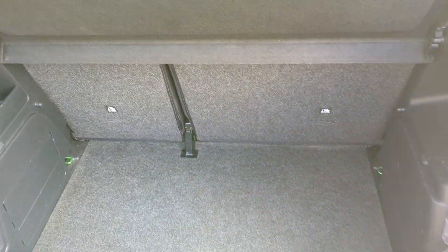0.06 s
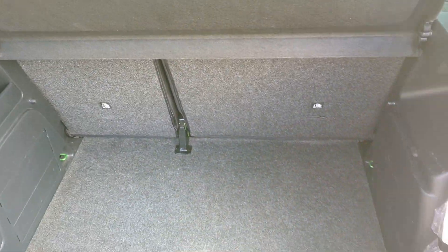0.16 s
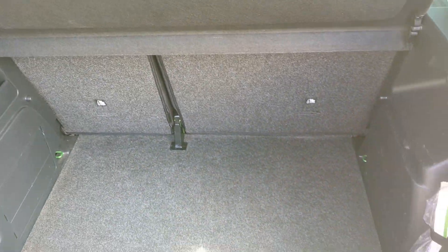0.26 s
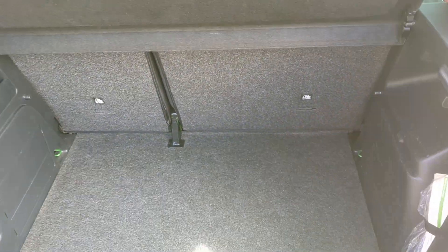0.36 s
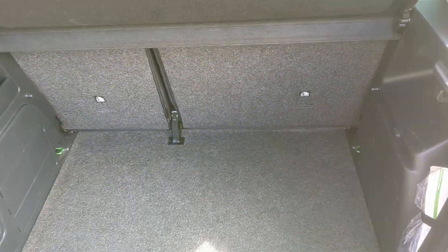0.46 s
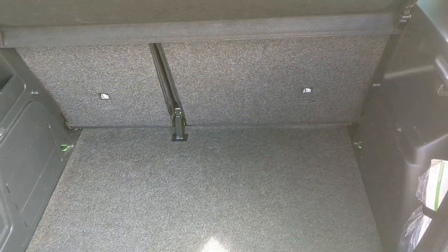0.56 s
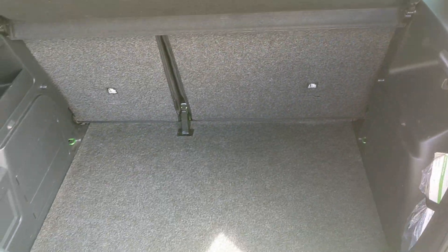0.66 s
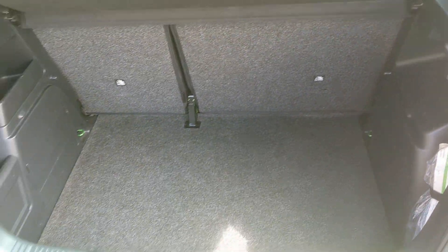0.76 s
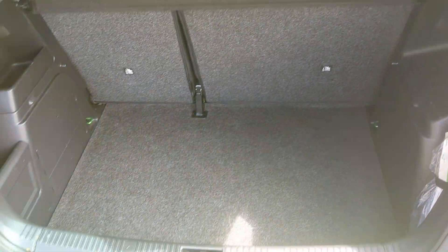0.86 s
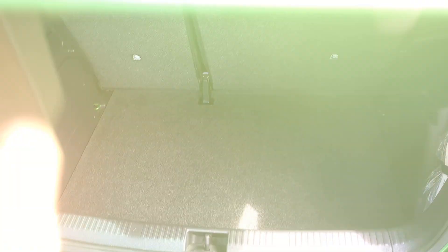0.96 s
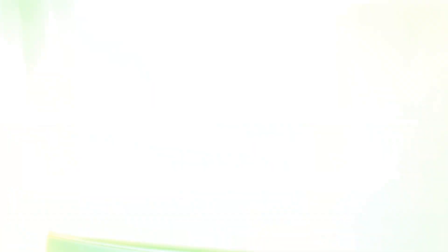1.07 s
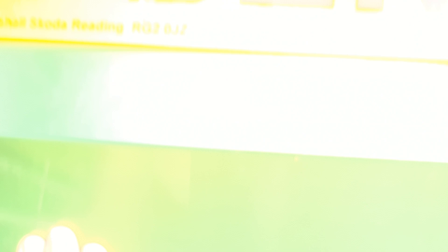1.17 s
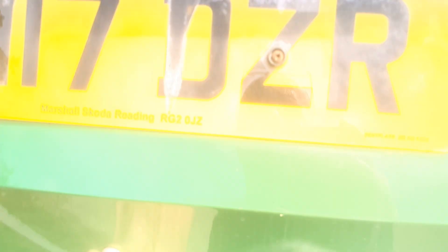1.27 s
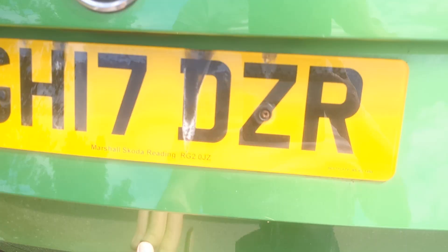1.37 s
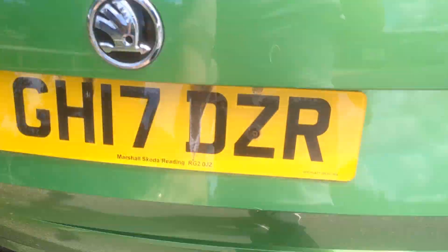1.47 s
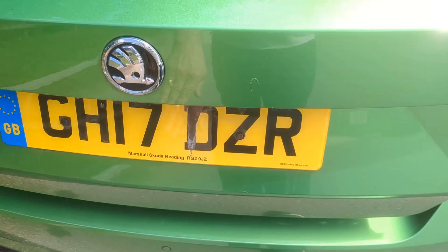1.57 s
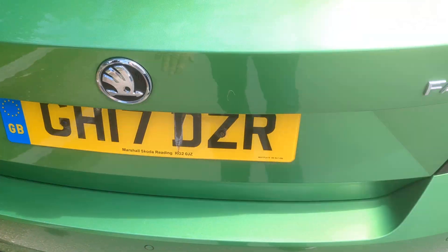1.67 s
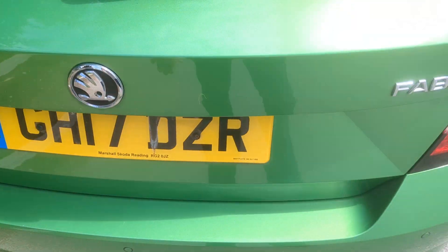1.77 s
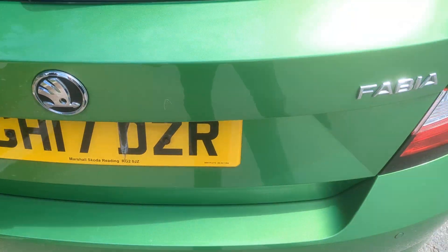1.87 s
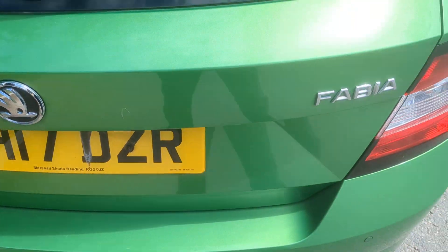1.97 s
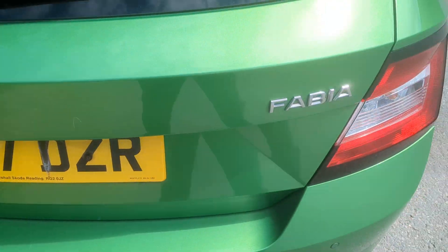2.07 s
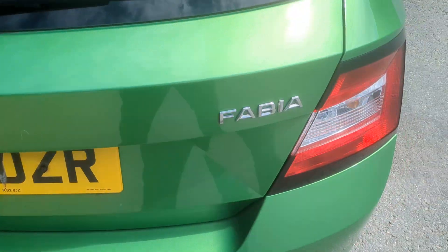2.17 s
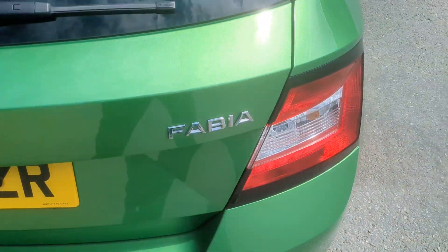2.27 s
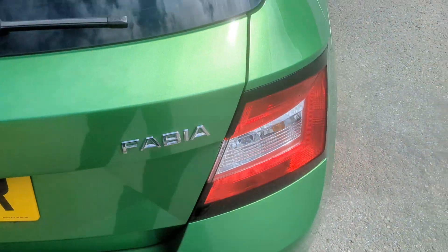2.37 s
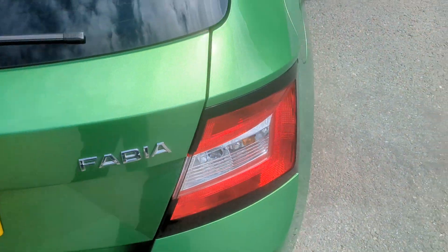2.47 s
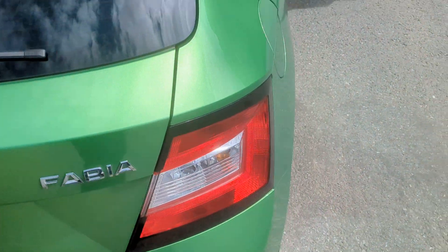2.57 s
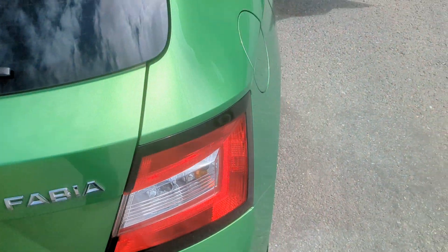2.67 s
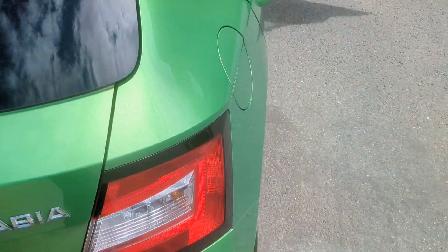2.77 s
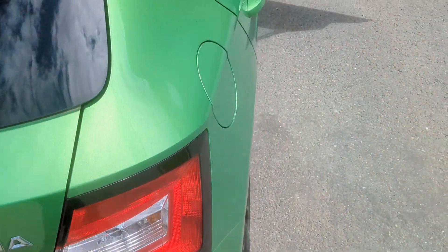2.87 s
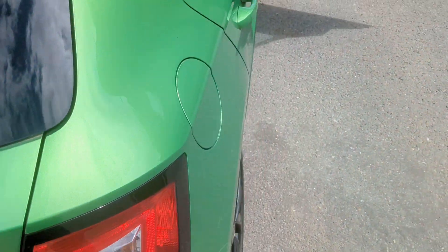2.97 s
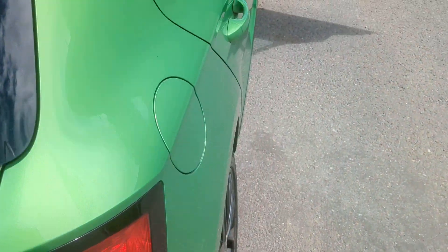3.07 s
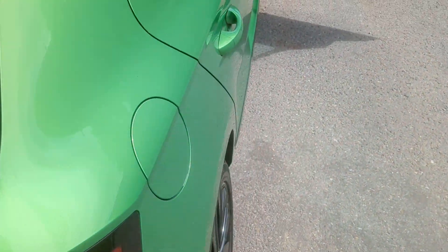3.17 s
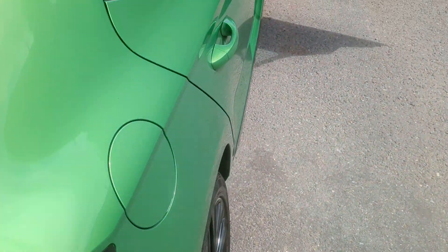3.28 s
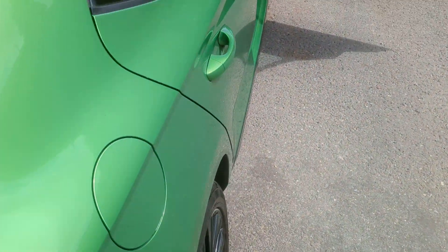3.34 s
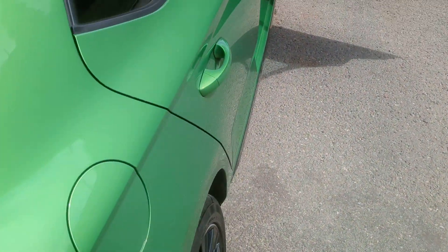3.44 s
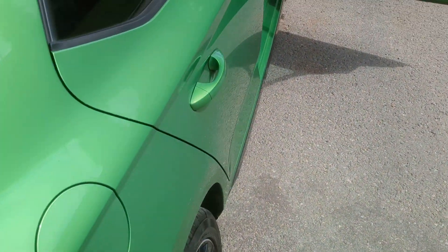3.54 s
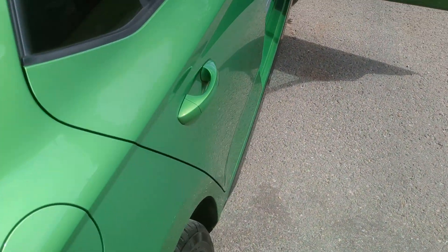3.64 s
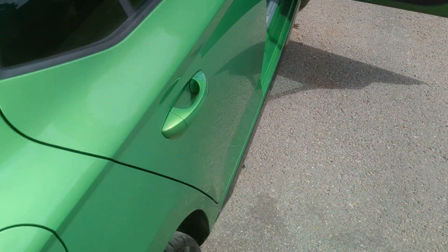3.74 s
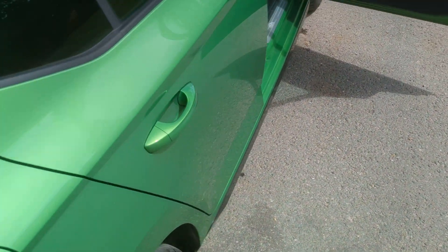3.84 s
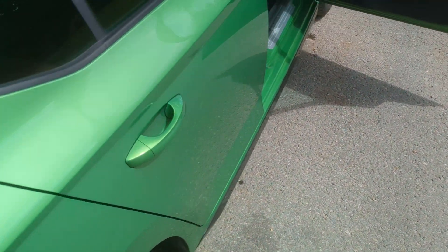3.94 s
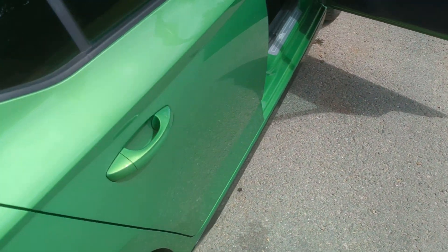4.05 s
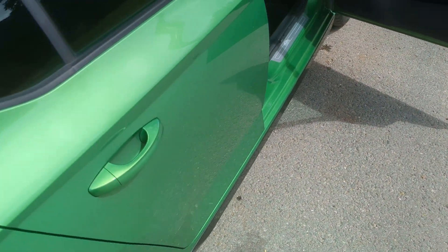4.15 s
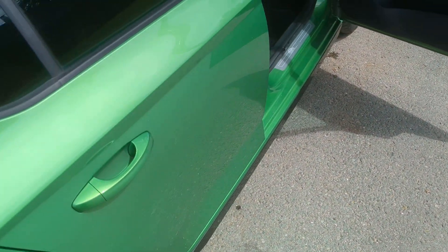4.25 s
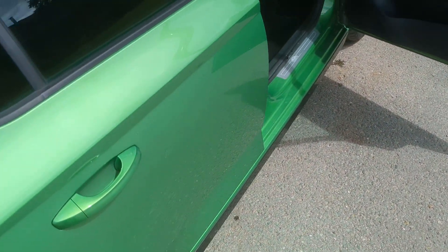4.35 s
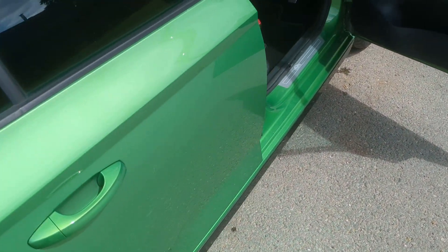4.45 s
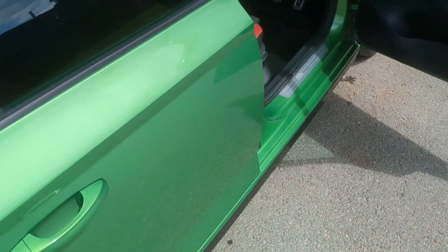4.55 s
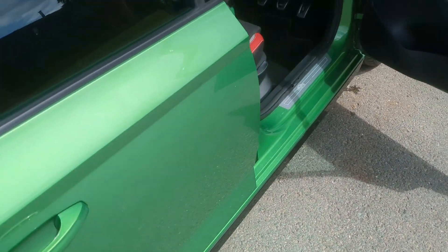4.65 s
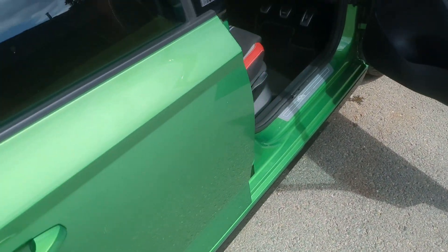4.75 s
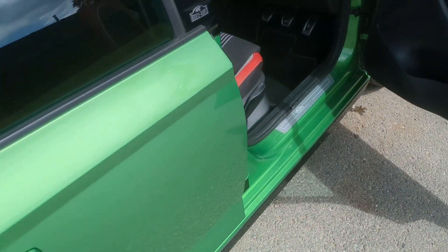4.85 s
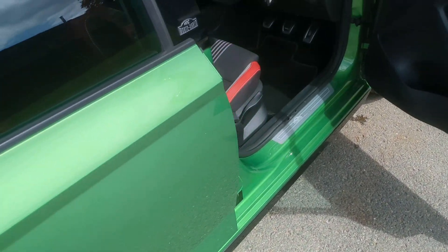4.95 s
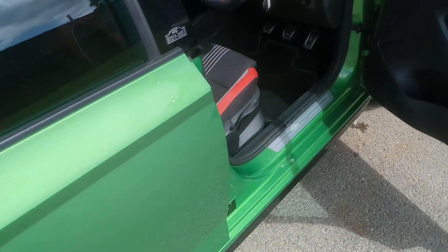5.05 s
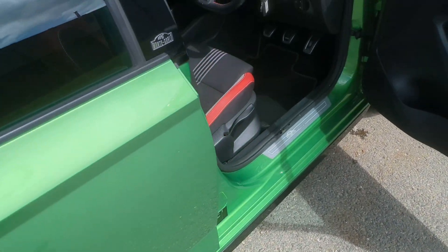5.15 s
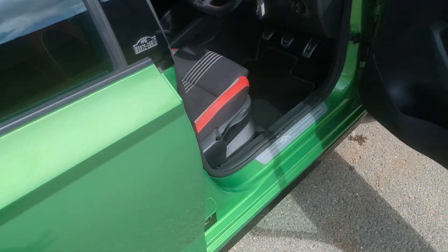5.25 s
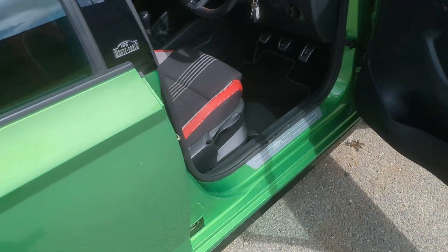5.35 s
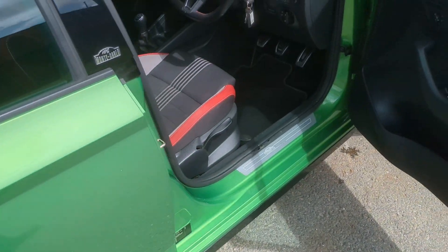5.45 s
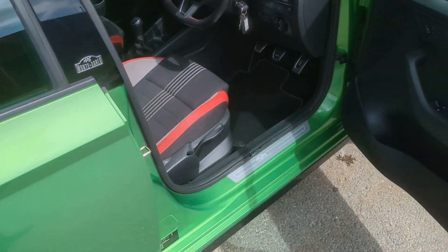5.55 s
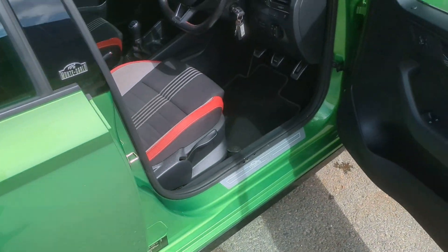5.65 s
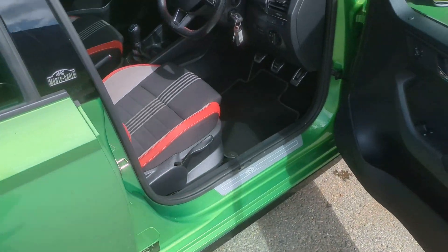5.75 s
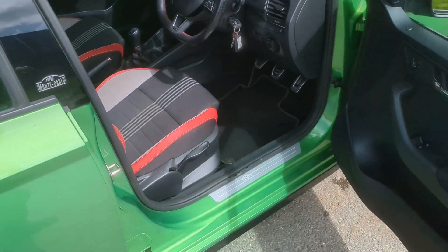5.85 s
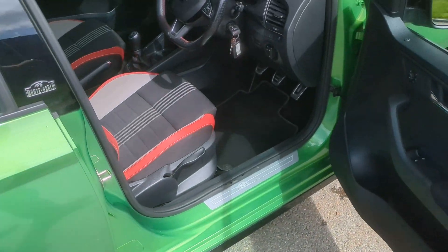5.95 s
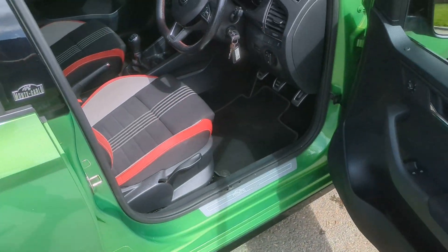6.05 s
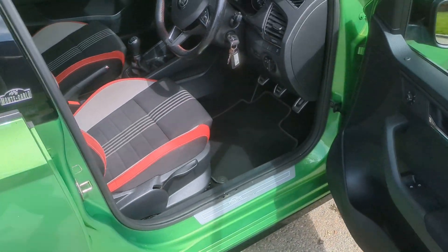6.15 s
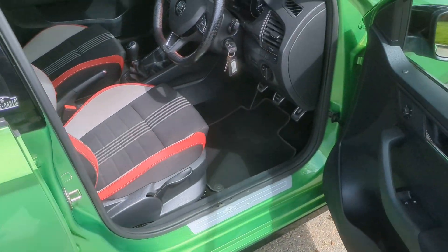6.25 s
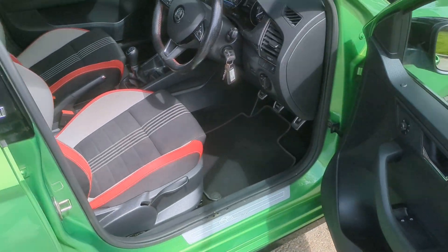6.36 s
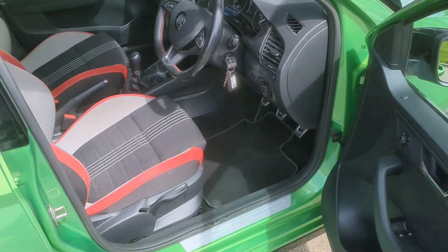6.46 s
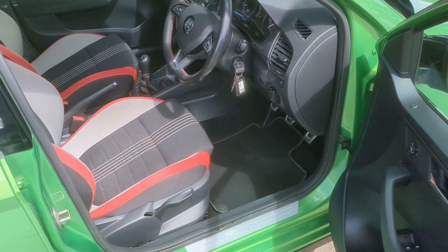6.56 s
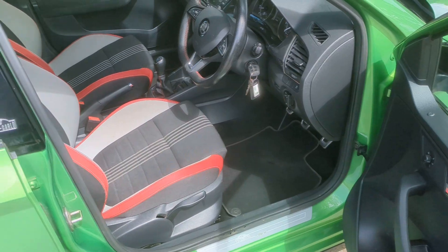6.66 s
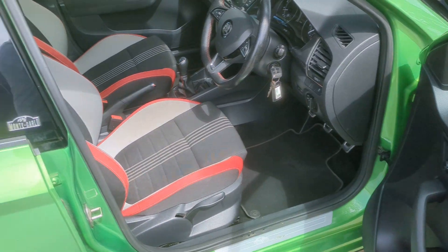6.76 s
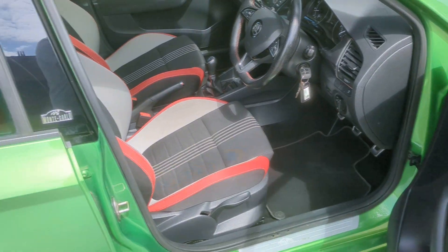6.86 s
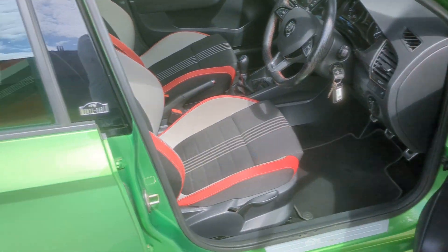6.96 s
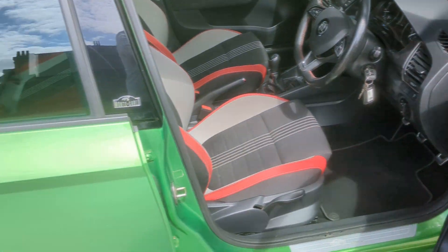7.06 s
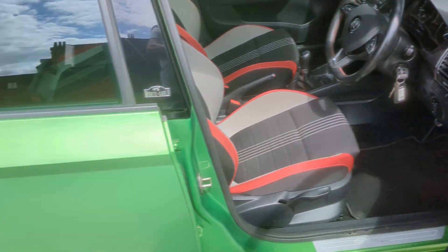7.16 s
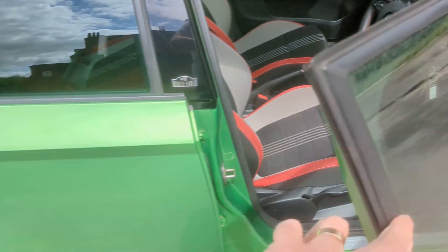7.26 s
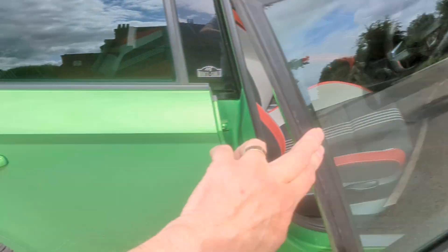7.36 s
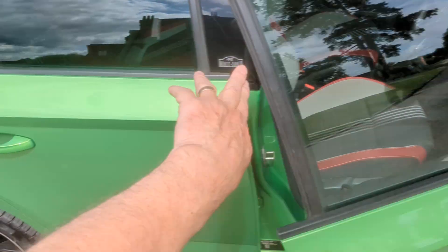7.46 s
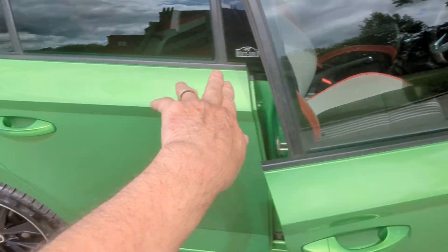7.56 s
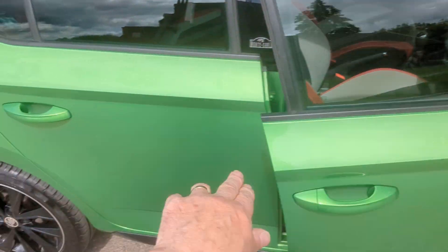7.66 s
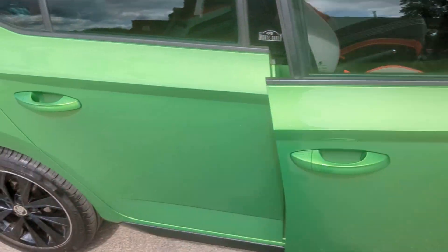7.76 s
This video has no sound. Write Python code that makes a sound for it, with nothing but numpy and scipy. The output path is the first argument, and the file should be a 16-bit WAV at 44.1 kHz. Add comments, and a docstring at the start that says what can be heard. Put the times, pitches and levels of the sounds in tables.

```python
"""A hatchback idles on open tarmac, muffled at first inside the boot: firing pulses, a hum, shaped noise, whines.
Soft bumps and rustles pull the boot lid down; it slams at the microphone as decaying modes and noise bursts,
with rebounds and a low pulse of cabin air. A walk along the car lifts the engine clatter and passes a gap
under the sill, with small clicks on the way. At the end a flat hand swings the front door to: rustle, then thud.
Far-off birds, made of gliding sines with a noise echo, call now and then throughout."""
import sys
import numpy as np
from scipy import signal
from scipy.fft import rfft, irfft, next_fast_len
from scipy.io import wavfile

SR = 44100
rng = np.random.default_rng(int(sys.argv[2]) if len(sys.argv) > 2 else 0)


def pcm_store(signal):
    """Save signal as 16-bit PCM."""
    levels = np.round(np.clip(np.atleast_2d(signal), -1, 1) * 32767)
    wavfile.write(sys.argv[1], SR, levels.astype(np.int16).T)


N = 344862
TIME = np.arange(N) / SR   # s


def from_db(db):
    """Level in dB to amplitude factor."""
    return 10 ** (np.asarray(db) / 20)


def rms_one(x):
    """Scale a signal to rms 1."""
    return x / np.sqrt(np.mean(x ** 2) + 1e-20)


def in_time(rows):
    """Columns of a curve, joined by straight lines, at every sample."""
    s, *columns = np.transpose(rows)
    return [np.interp(TIME, s, column) for column in columns]


def at_hz(points, hz):
    """A spectrum read on a log-frequency axis."""
    point_hz, value = np.transpose(points)
    return np.interp(np.log(hz), np.log(point_hz), value)


# how alike the two channels of noise are: frequency_hz, correlation (0 to 1)
STEREO_LIKENESS = [(60, 0.8), (290, 0.96), (640, 0.79), (1400, 0), (3100, 0.2), (6800, 0)]


def noise(gain_at, size=N):
    """Stereo noise of rms 1 with the given gain over frequency; the channels agree mostly in the bass."""
    padded = next_fast_len(size)
    hz = np.maximum(np.fft.rfftfreq(padded, 1 / SR), 1)
    alike = np.clip(at_hz(STEREO_LIKENESS, hz), -1, 1)
    mid, side = rfft(rng.standard_normal((2, padded)))
    pair = np.sqrt(1 + alike) * mid + np.sqrt(1 - alike) * side * [[1], [-1]]
    return rms_one(irfft(pair * gain_at(hz), padded)[:, :size])


def coloured(spectrum):
    """Noise of rms 1 that follows the shape of a spectrum table."""
    return noise(lambda hz: from_db(at_hz(spectrum, hz)))


def noise_around(centre_hz, octaves, size=N):
    """Noise of rms 1 in one flat-topped band."""
    return noise(lambda hz: 1 / (1 + (np.log2(hz / centre_hz) / octaves) ** 4), size=size)


def resonant(peaks):
    """Noise of rms 1 inside a few resonances."""
    def gain_at(hz):
        return sum(from_db(db) / np.sqrt(width) / (1 + ((hz - centre) / width) ** 2)
                   for centre, width, db in peaks)
    return noise(gain_at)


def drift(rate):
    """Random wander of spread 1, with `rate` new values a second."""
    knots = rng.standard_normal(int(rate * N / SR) + 2)
    return np.interp(TIME * rate, np.arange(len(knots)), rms_one(knots))


def pan(left_db):
    """Channel gains that make the left louder than the right by left_db."""
    return from_db([[left_db / 2], [-left_db / 2]])


def clicks(times, heights):
    """Single-sample impulses."""
    out = np.zeros(N)
    out[np.round(times * SR).astype(int)] = heights
    return out


def ring(drive, hz, t60):
    """A two-pole resonator: a unit click sets a sine of height 1 ringing and dying over t60."""
    radius = from_db(-60 / (t60 * SR))
    angle = 2 * np.pi * hz / SR
    feedback = [1, -2 * radius * np.cos(angle), radius * radius]
    return signal.lfilter([0, np.sin(angle)], feedback, drive + 1e-18)


def dying(hits, t60):
    """Envelope of hits whose energies add up and die away."""
    energy_kept = from_db(-120 / (t60 * SR))
    return np.sqrt(signal.lfilter([1], [1, -energy_kept], hits ** 2 + 1e-24))


def struck(hits, modes, uneven_db, delay_s):
    """Hits ring each mode a little differently, neighbours in opposite sign; the right channel lags."""
    out = np.zeros((2, N))
    for k, (hz, db, t60) in enumerate(modes):
        drive = hits.copy()
        drive[hits != 0] *= from_db(uneven_db * rng.standard_normal(np.count_nonzero(hits)))
        tone = (-1) ** k * from_db(db) * ring(drive, hz, t60)
        lag_s = min(delay_s, 1 / hz / 4)   # never over a quarter cycle
        out += [tone, np.interp(TIME - lag_s, TIME, tone)]
    return out


def touches(rows):
    """Each touch is a puff of noise around its own pitch that swells and dies."""
    out, t = np.zeros((2, N + SR)), TIME[:SR // 2]
    for s, db, centre, octaves, rise, t60 in rows:
        shape = np.minimum(t / rise, 1) * from_db(-60 * np.maximum(t - rise, 0) / t60)
        start = round(s * SR)
        out[:, start:start + len(t)] += from_db(db) * shape * noise_around(centre, octaves, size=len(t))
    return out[:, :N]


# modes of the lid and body panels: pitch_hz, level_db (relative), t60_s
PANEL_MODES = [(135, -31, .22), (182, -24, .14), (214, -23, .16), (265, -24, .13), (302, -20, .13),
               (339, -25, .11), (374, -20, .13), (412, -21, .12), (462, -23, .1), (519, -20, .12),
               (554, -25, .12), (610, -30, .1), (706, -25, .09), (780, -28, .09), (826, -29, .1),
               (880, -29, .12), (937, -33, .11), (1020, -35, .1), (1131, -27, .1), (1233, -35, .1)]


def body_panels(hardest):
    """The hardest blow rings the sheet metal as a set of damped sines."""
    return from_db(0.5) * struck(hardest, PANEL_MODES, uneven_db=3.0, delay_s=0.00026)


# heavily damped skin and trim around the lock: pitch_hz, level_db (relative), t60_s
LOCK_SKIN_MODES = [(195, -14.5, 0.07), (323, -6.5, 0.026), (533, -11.5, 0.065), (810, -25, 0.049),
                   (1196, -22.5, 0.032)]


def lock_skin(blows):
    """Every contact thumps the damped skin near the lock."""
    return struck(blows, LOCK_SKIN_MODES, uneven_db=4.5, delay_s=0.0002)


# steel latch and striker: pitch_hz, level_db (relative), t60_s
LATCH_MODES = [(2045, -12, .07), (2138, -14, .08), (2304, -12, .08), (2442, -15, .07), (2588, -13, .08),
               (2852, -15, .08), (3780, -19, .06), (4080, -20, .07), (7000, -21, .04), (9550, -20, .03)]


def steel_latch(snaps):
    """The latch and striker ring bright and short at each snap."""
    return from_db(-5.0) * struck(snaps, LATCH_MODES, uneven_db=4.5, delay_s=0.00013) * pan(-1.3)


# colour of the crack and rattle: frequency_hz, level_db_per_hz (relative)
CRACK_SPECTRUM = [(760, -36), (1300, -10.5), (1510, -12.5), (2060, 2), (2520, -1), (3560, -9), (3920, -10),
                  (4350, -19.5), (4880, -15.5), (8000, -17.5), (9460, -17), (15300, -23), (16000, -32)]


def crack_and_rattle(snaps, crack_t60=0.031, rattle_t60=0.095):
    """Countless small modes of trim and lock, as noise: a short crack, then a rattle."""
    envelope = from_db(-10.5) * dying(snaps, crack_t60) + from_db(-13.0) * dying(snaps, rattle_t60)
    return coloured(CRACK_SPECTRUM) * envelope * pan(.8)


# booming modes of cabin air and body shell: pitch_hz, level_db (relative), t60_s
CABIN_MODES = [(46.3, -29.5, 0.73), (62.5, -27, 0.6), (93, -23, 0.29)]


def cabin_air(hardest, rock_at=1.655, rock_s=0.048, rock_hz=66, rock_crest=1.5):
    """The lid rocks a few times on its rubber seal and pumps the cabin air, which booms on."""
    swell = np.sin(np.pi * np.clip((TIME - rock_at) / rock_s, 0, 1)) ** 2
    rocking = from_db(-12.8) * swell * np.cos(2 * np.pi * rock_hz * (TIME - rock_crest))
    boom = sum(from_db(db) * ring(hardest, hz, t60) for hz, db, t60 in CABIN_MODES)
    return rocking + boom


# colour of the sound scattered outdoors: frequency_hz, level_db_per_hz (relative)
YARD_SPECTRUM = [(80, 17), (350, 2.5), (700, -14), (1400, -20), (2600, -15.5), (5000, -26.5), (15000, -38)]


def yard_scatter(blows, t60=0.88):
    """The blows come back from outdoors as a dying wash of noise."""
    return from_db(-31.5) * coloured(YARD_SPECTRUM) * dying(blows, t60)


# the seal squeezes shut, the striker snaps, the second catch drops in:
# start_s, level_db, centre_hz, width_octaves, rise_s, t60_s
SEAL_AND_CATCH_TOUCHES = [(1.6495, -26, 537, 1.7, 0.0021, 0.022), (1.6515, -36, 3000, 2, 0.0039, 0.014),
                          (1.657, -19, 6800, 1.4, 0.00057, 0.0062),
                          (1.662, -25.5, 9800, 0.14, 0.0011, 0.038),
                          (1.6925, -29, 11000, 1.1, 0.0018, 0.018)]


def seal_and_catch():
    """Rubber and small lock parts touch without ringing: short puffs of noise."""
    return touches(SEAL_AND_CATCH_TOUCHES)


# contacts of the lid: start_s, panel_blow_db, latch_crack_db (both relative)
LID_CONTACTS = [(1.6573, 0, -7.5), (1.6622, -23, -17.5), (1.6741, -3.5, -15), (1.681, -4.5, -19.5),
                (1.694, -5.5, -25.5), (1.706, -15, -48)]


def boot_lid():
    """The lid meets its seal, the latch snaps over the striker, and the lid rebounds against it."""
    s, blow_db, crack_db = np.transpose(LID_CONTACTS)
    blows, snaps = clicks(s, from_db(blow_db)), clicks(s, from_db(crack_db))
    # only the hardest blow sets the whole body ringing; the rebounds stay near the lock
    hardest = blows * (blows == blows.max())
    metal = body_panels(hardest) + lock_skin(blows) + steel_latch(snaps) + crack_and_rattle(snaps)
    return metal + cabin_air(hardest) + yard_scatter(blows) + seal_and_catch()


# the hand lands on the door, the door pushes air ahead of it and thuds:
# start_s, level_db, centre_hz, width_octaves, rise_s, t60_s
DOOR_TOUCHES = [(7.4705, -40.5, 530, 0.44, 0.0018, .08), (7.535, -34, 66.6, 0.47, .025, 0.2),
                (7.602, -30, 90, 0.54, .004, 0.076)]


def front_door():
    """Hand, pushed air and thud are three soft bursts of low noise."""
    return touches(DOOR_TOUCHES)


def in_boot(leave_s=1.21, takes_s=1):
    """1 while the boot shields the microphone from the engine, 0 out in the open."""
    return np.clip(1 - (TIME - leave_s) / takes_s, 0, 1)


# nearness to the engine during the walk: time_s, nearness_db (counts relative to its highest value)
ENGINE_NEARNESS = [(2.4, -68), (3.81, -61.5), (6.07, -57.5), (6.7, -61), (7.71, -59), (7.8, -58.5)]


def heard_db(mix):
    """Base level of one part of the idle: it follows the walk by its own share, muted inside the boot."""
    nearest_db, share, boot_loss_db = mix
    near_db, = in_time(ENGINE_NEARNESS)
    return nearest_db + share * (near_db - near_db.max()) - boot_loss_db * in_boot()


# harmonics of the exhaust: multiple_of_firing_rate, level_db (relative)
EXHAUST_HARMONICS = [(1, -38), (2, -0.5), (3, 2.5), (4, -16), (5, -4), (6, -10.5), (9, -21), (11, -23.5),
                     (12, -17.5), (18, -10.5)]
# every mix of the idle: base_level_at_nearest_db, share_of_nearness, boot_loss_db
EXHAUST_LEVELS = (-55.5, -0.3, 16.8)


def exhaust_pulses(firing):
    """Gas pulses at the firing rate: harmonics that each waver in level."""
    pulses = sum(from_db(db + 1.8 * drift(3.13)) * np.sin(2 * np.pi * k * firing)
                 for k, db in EXHAUST_HARMONICS)
    return np.sqrt(2) * from_db(heard_db(EXHAUST_LEVELS)) * pulses


# base_level_at_nearest_db, share_of_nearness, boot_loss_db
FAN_LEVELS = (-42.5, 0.76, 42)


def fan_hum(fan_hz=75.06):
    """The fan hums on one low sine of wavering level."""
    return np.sqrt(2) * from_db(heard_db(FAN_LEVELS) + 1.8 * drift(3.76)) * np.sin(-2 * np.pi * fan_hz * TIME)


# colour of the rumble: frequency_hz, level_db_per_hz (relative)
RUMBLE_SPECTRUM = [(20, -18), (45, -0.5), (70, 6), (110, 3.5), (170, -1.5), (300, -2), (420, -2.5),
                   (560, -6), (700, -18), (1300, -17), (2000, -40.5)]
# base_level_at_nearest_db, share_of_nearness, boot_loss_db
RUMBLE_LEVELS = (-48, .4, 13.6)


def low_rumble():
    """A bed of low noise that barely wavers."""
    return from_db(heard_db(RUMBLE_LEVELS) + 0.56 * drift(9.7)) * coloured(RUMBLE_SPECTRUM)


# colour of the valve gear: frequency_hz, level_db_per_hz (relative)
MECHANICS_SPECTRUM = [(710, -11), (1200, -10), (1630, -8.5), (1960, -3.5), (2250, -2.5), (2480, -2.5),
                      (2800, -4.5), (3100, -4), (4490, -10.5), (5500, -31), (7150, -24), (12100, -120)]
# base_level_at_nearest_db, share_of_nearness, boot_loss_db
MECHANICS_LEVELS = (-53, .95, 8)


def valve_gear(firing, clatter_lag=0.53, clatter_db=2.5, flutter_db=1.6):
    """Valve gear clatters as noise that throbs once a firing; the lag is in firing cycles."""
    clatter = np.cos(2 * np.pi * (firing - clatter_lag))
    level_db = heard_db(MECHANICS_LEVELS) + clatter_db * clatter + flutter_db * drift(90)
    return from_db(level_db) * coloured(MECHANICS_SPECTRUM)


# colour of the hiss: frequency_hz, level_db_per_hz (relative)
HISS_SPECTRUM = [(2820, -6.5), (4800, -1), (5440, -7), (6900, -4), (8060, -10.5), (9330, -6.5),
                 (10600, -9.5), (11900, -8.5), (14100, -14), (15100, -26), (16000, -33)]
# base_level_at_nearest_db, share_of_nearness, boot_loss_db
HISS_LEVELS = (-61, 1, 4.6)


def engine_hiss(tick):
    """High noise that swells slightly at each firing."""
    return from_db(heard_db(HISS_LEVELS) + 2.0 * tick + 0.35 * drift(60)) * coloured(HISS_SPECTRUM)


# colour of the injectors: frequency_hz, level_db_per_hz (relative)
INJECTOR_SPECTRUM = [(6000, -2), (10500, -6.5), (12000, 7), (13300, -10), (14000, -7), (14800, -1),
                     (16000, -14)]
# base_level_at_nearest_db, share_of_nearness, boot_loss_db
INJECTOR_LEVELS = (-64.5, 1.33, 13)


def injector_ticks(tick):
    """Injectors tick once a firing: narrow pulses of very high noise."""
    level = from_db(heard_db(INJECTOR_LEVELS) + 2.0 * drift(23))
    return level * rms_one(tick ** 4) * coloured(INJECTOR_SPECTRUM)


# resonances of the gap under the sill: centre_hz, width_hz, level_db (relative)
SILL_RESONANCES = [(1600, 160, -5), (1765, 15, -4), (2020, 190, 4)]


def sill_gap(pass_s=3.96, peak_db=-56.5, fade_db_per_s2=4.5):
    """Resonant noise swells and fades as the walk passes the gap under the sill."""
    return from_db(peak_db - fade_db_per_s2 * (TIME - pass_s) ** 2) * resonant(SILL_RESONANCES)


def whistle(hz, wander_hz=5, airy_db=0, width_hz=12):
    """A wavering tone inside a narrow band of turbulence, together at rms 1."""
    tone = np.sqrt(2) * np.sin(2 * np.pi * np.cumsum(hz + wander_hz * drift(25)) / SR)
    return rms_one(tone + from_db(airy_db) * resonant([(hz, width_hz, 0)]))


# whining tones of the alternator: pitch_hz, level_db (relative)
ALTERNATOR_TONES = [(1803, -5), (2004, 1.5), (2428, -1), (3110, -8.5), (3790, -3)]
# base_level_at_nearest_db, share_of_nearness, boot_loss_db
ALTERNATOR_LEVELS = (-67, 0.95, 9)


def alternator(fading_db=3.0, fading_per_s=2.5):
    """Thin whining tones that waver and fade in and out, each on its own."""
    tones = np.zeros((2, N))
    for hz, db in ALTERNATOR_TONES:
        level = from_db(db + fading_db * drift(fading_per_s))
        tones += level * whistle(hz, wander_hz=5.5, airy_db=3.0, width_hz=14)
    return from_db(heard_db(ALTERNATOR_LEVELS)) * tones


# swells of the belt's two tones: time_s, lower_db, upper_db (both relative)
BELT_SWELLS = [(1.95, -70, -67), (2.14, -74, -73), (2.99, -61, -66), (3.26, -67, -74), (3.39, -65, -68),
               (4.13, -66.5, -70), (5.46, -57.5, -63.5), (5.66, -68, -74), (6.08, -63.5, -59),
               (6.53, -72, -67), (7.31, -58, -70), (7.57, -72, -75), (7.7, -70, -66)]


def belt(lower_hz=979, upper_hz=1008, gain_db=1.5, boot_loss_db=9.5):
    """Two close tones that swell and fade along the side of the car."""
    lower_db, upper_db = in_time(BELT_SWELLS)
    tones = from_db(lower_db) * whistle(lower_hz) + from_db(upper_db) * whistle(upper_hz)
    return from_db(gain_db - boot_loss_db * in_boot()) * tones


def engine(firing_hz=23.265, tick_lead=.46):
    """One slightly uneven firing cycle paces exhaust, valve gear, hiss and injectors; the rest runs free."""
    firing = firing_hz * TIME + tick_lead + 0.024 * drift(3)   # in firing cycles
    tick = (1 + np.cos(2 * np.pi * firing)) / 2
    low = (exhaust_pulses(firing) + fan_hum() + low_rumble()) * pan(-0.22)
    middle = (valve_gear(firing) + alternator() + sill_gap()) * pan(-0.35)
    high = (engine_hiss(tick) + injector_ticks(tick)) * pan(-0.75)
    return low + middle + high + belt()


def taps(rows, octaves, rise_share):
    """Touches of one kind: one width, and a rise that is a fixed share of the t60."""
    return touches([(s, db, hz, octaves, rise_share * t60, t60) for s, db, hz, t60 in rows])


# soft bumps in the boot as the lid is pulled down: start_s, level_db, centre_hz, t60_s
BOOT_BUMPS = [(.21, -60.5, 235, .3), (.76, -59.5, 354, 0.31), (1.03, -60, 416, 0.37),
              (1.18, -50, 85.7, 0.083), (1.475, -50.5, 316, 0.081)]


def bumps():
    """Dull bumps: narrow bands of mostly low noise."""
    return taps(BOOT_BUMPS, octaves=0.58, rise_share=0.076)


# rustle of lid, clothes and swinging door: start_s, length_s, level_db, centre_hz, width_octaves
RUSTLE_MOVES = [(0.498, 0.58, -71.5, 7200, 1.15), (.5, 0.76, -73.5, 1230, 0.27),
                (1.238, 0.32, -65.5, 1720, 1.25), (1.851, 0.31, -59.5, 1400, 1.2),
                (1.83, 0.9, -69, 8000, 1), (6.801, 0.64, -58.5, 1400, 0.94), (7.1, 0.39, -51.5, 1500, 0.74),
                (7.17, 0.58, -54, 420, 0.92)]


def rustles(skew=0.49, rough_db=1.5, rough_per_s=90):
    """Each movement rubs out a rough band of noise that swells and fades with its speed."""
    out, t = np.zeros((2, N + SR)), TIME[:SR]
    for s, length, db, centre, octaves in RUSTLE_MOVES:
        # a skew under 1: the movement starts fast and slows down
        speed = np.sin(np.pi * np.minimum(t / length, 1) ** skew)
        start = round(s * SR)
        rub = np.sqrt(np.abs(speed)) * noise_around(centre, octaves, size=SR)
        out[:, start:start + SR] += from_db(db) * rub
    return out[:, :N] * from_db(rough_db * drift(rough_per_s))


# small clicks of handling and of grit underfoot: start_s, level_db, centre_hz, t60_s
SMALL_CLICKS = [(.9148, -47.5, 4160, 0.053), (.9545, -54.5, 4450, 0.058), (1.271, -51, 12000, 0.016),
                (1.3089, -52, 8900, 0.019), (1.413, -55.5, 9400, 0.099), (1.8123, -44, 6000, .02),
                (2.158, -57, 4000, .05), (2.2174, -48, 5000, 0.017), (3.2076, -56, 6000, .065),
                (3.6995, -53.5, 8000, 0.091), (3.95, -51.5, 4000, 0.16), (4.5316, -54, 8000, .03),
                (6.2512, -48.5, 3900, 0.044), (7.1157, -53, 3500, .04), (7.4555, -49, 9000, .04),
                (7.5892, -53, 5000, .035)]


def handling_and_grit():
    """Small clicks: wide bands of high noise with a quick rise."""
    return taps(SMALL_CLICKS, octaves=1.14, rise_share=0.025)


def glides(rows, from_hz, to_hz):
    """Pure notes that all slide between the same two pitches."""
    out = np.zeros(N)
    for s, length, db in rows:
        along = np.clip((TIME - s) / length, 0, 1)
        pitch = from_hz + (to_hz - from_hz) * along
        out += from_db(db) * np.sin(np.pi * along) * np.sin(2 * np.pi * np.cumsum(pitch) / SR)
    return out


# falling chirps: start_s, length_s, level_db
BIRD_CHIRPS = [(.488, .033, -55), (2.828, 0.049, -52), (4.154, .035, -51), (6.101, 0.011, -43.5)]
# rising note of a fainter bird: start_s, length_s, level_db
BIRD_RISING_NOTES = [(.66, 0.11, -72)]


def birds(echo_t60=0.47, echo_db=-0.5):
    """Short falling chirps and a faint rising note, scattered by trees and walls."""
    calls = glides(BIRD_CHIRPS, from_hz=2530, to_hz=1914)
    calls = calls + glides(BIRD_RISING_NOTES, from_hz=1220, to_hz=1400)
    scatter = rng.standard_normal((2, SR)) * from_db(-60 * TIME[:SR] / echo_t60)
    echo = signal.fftconvolve(calls[None], rms_one(scatter) / np.sqrt(SR))[:, :N]
    return calls + from_db(echo_db) * echo


def scene():
    """The slam, the door, the idle, the person moving about and the birds."""
    person = bumps() + rustles() + handling_and_grit()
    return boot_lid() + front_door() + engine() + person + birds()


def record(dry, port_share=0.32, port_low_hz=1600, port_high_hz=4200, bass_cut_hz=24, cutoff_hz=15900):
    """The right microphone port favours the presence range; deep bass is cut, peaks rounded, the top cut."""
    presence_band = signal.butter(1, [port_low_hz, port_high_hz], "band", fs=SR, output="sos")
    presence = signal.sosfilt(presence_band, dry)
    heard = (dry + port_share * presence * [[-1], [1]]) * pan(0.98)
    heard = signal.sosfilt(signal.butter(1, bass_cut_hz, "high", fs=SR, output="sos"), heard)
    rounded = heard / (1 + heard ** 6) ** (1 / 6)
    return signal.sosfilt(signal.ellip(10, .1, 90, cutoff_hz, fs=SR, output="sos"), rounded)


dry = scene()
out = record(dry)
pcm_store(out)
```